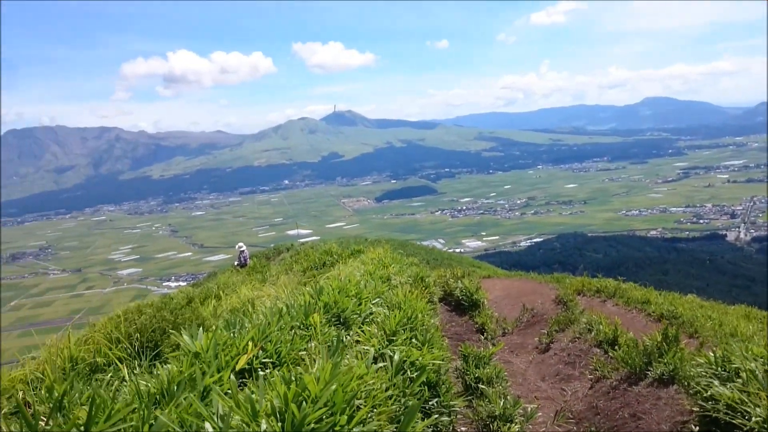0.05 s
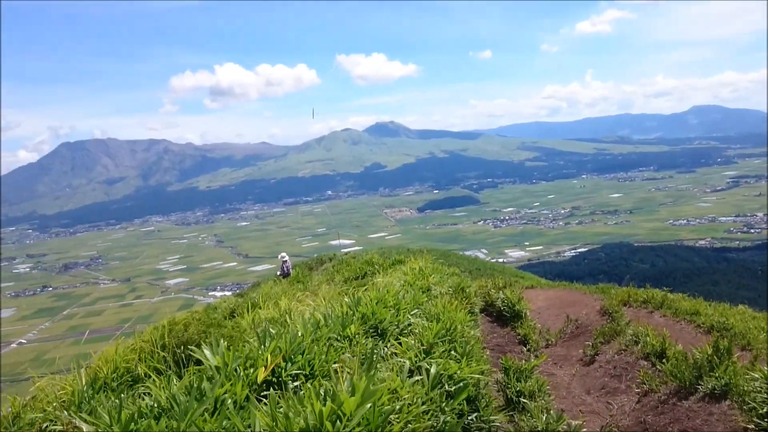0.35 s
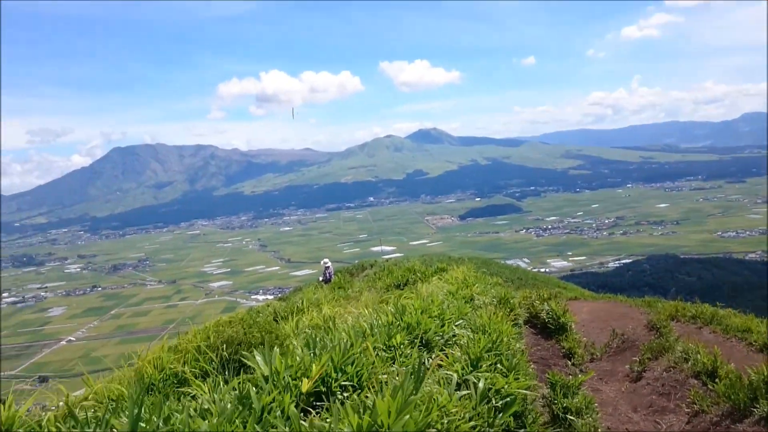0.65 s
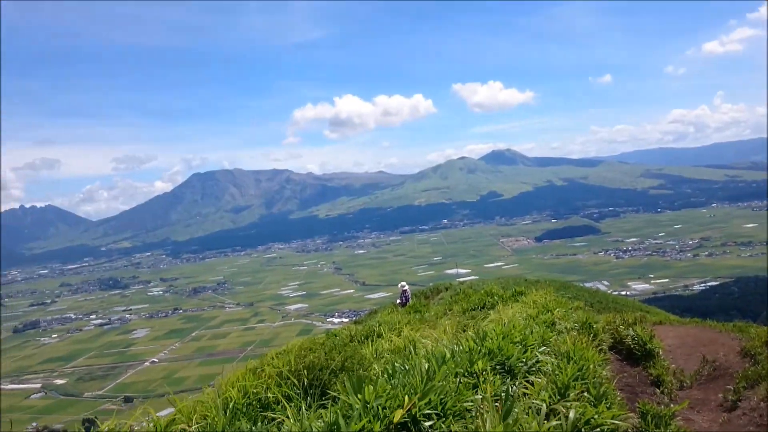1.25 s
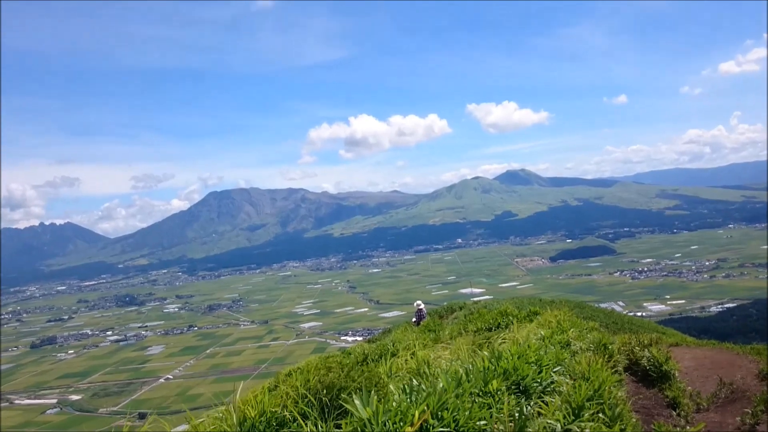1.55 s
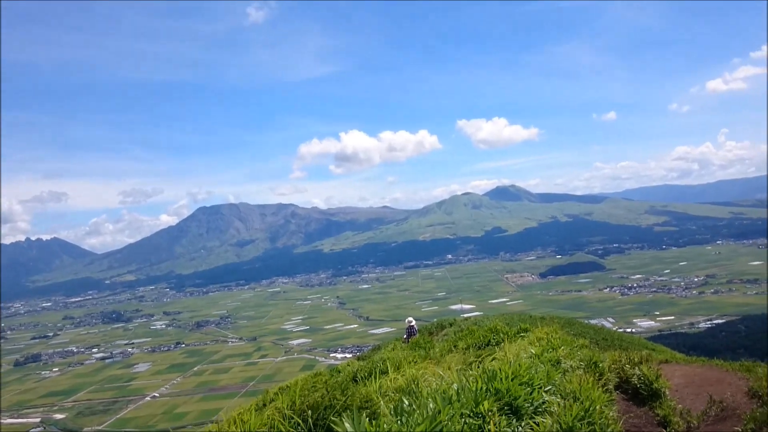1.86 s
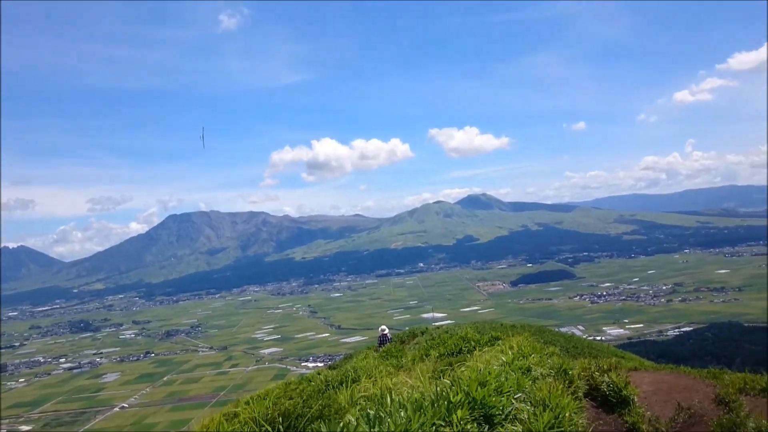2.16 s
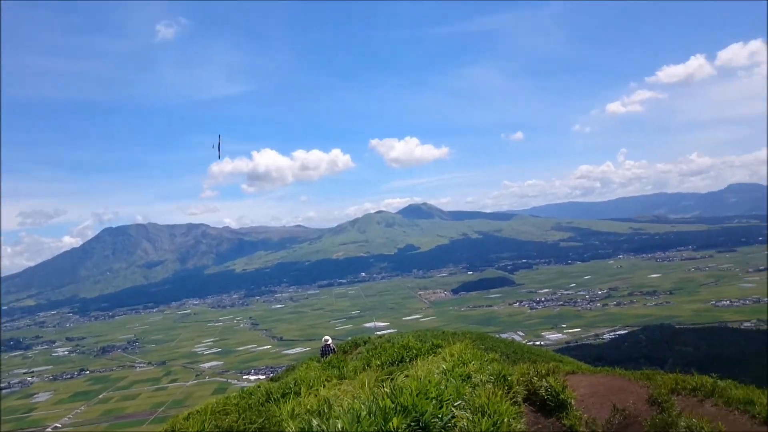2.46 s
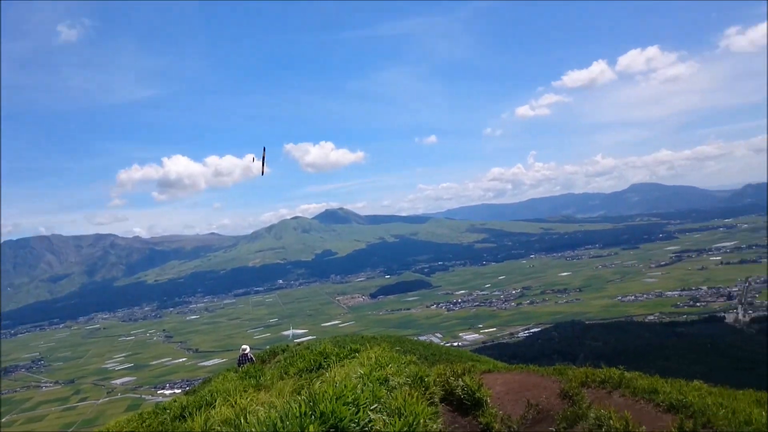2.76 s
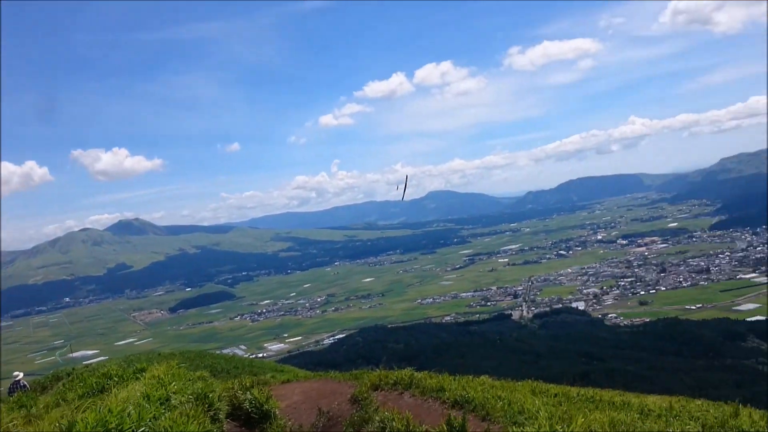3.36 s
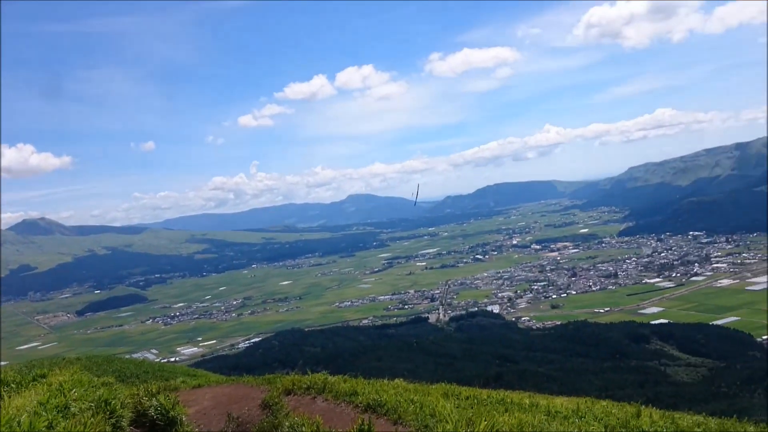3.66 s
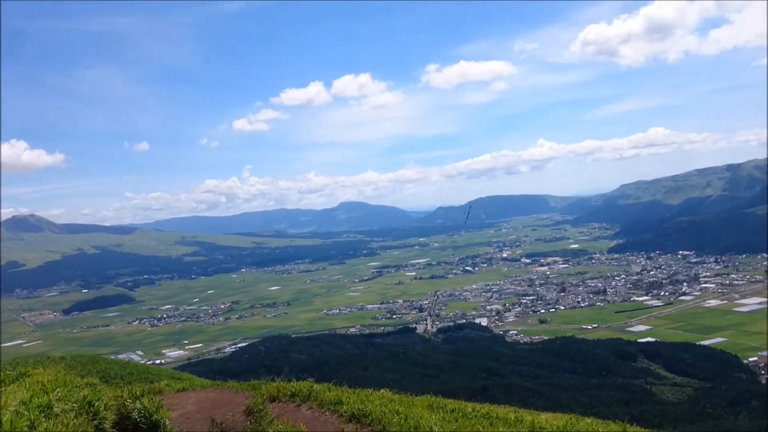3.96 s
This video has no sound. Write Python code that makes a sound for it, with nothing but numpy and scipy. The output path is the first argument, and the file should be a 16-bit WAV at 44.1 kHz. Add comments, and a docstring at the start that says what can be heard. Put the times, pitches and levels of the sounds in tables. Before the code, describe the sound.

A small model glider whistles faintly on the right, in thin, broken tones over rushing air. Wind buffets the microphone with rumbles and thumps until about 1.5 seconds, then drops, leaving the whistles clearer and slightly rising. After 2.2 seconds their pitch sags as the glider passes and gusts return; from 3 seconds they turn breathy. Hillside grass hisses softly throughout, swelling until about 2.5 seconds.

```python
"""Grassy hilltop, stereo microphone out in the wind, a model glider sweeping past on the right.
At first gusts buffet the two ports separately while air over the glider's edges and gaps starts thin,
broken whistles. The wind drops at about 1.5 s and the tones stand clear, rising together as the glider
gathers speed. After 2.2 s they sag as it passes and the gusts return; the last whistles are breathy.
Behind it all the hillside hisses, with swells in the nearby grass until about 2.5 s."""
import sys
import numpy as np
from scipy import signal
from scipy.fft import rfft, irfft
from scipy.io import wavfile

SR = 44100
rng = np.random.default_rng(int(sys.argv[2]) if len(sys.argv) > 2 else 0)


def put_to_file(sound):
    """Save the sound as 16-bit audio at rate SR, in the file named by the first command-line argument."""
    columns = np.atleast_2d(sound).T  # one column per channel
    safe = np.clip(columns, -1, 1)
    whole_steps = np.round(safe * 32767)
    wavfile.write(sys.argv[1], SR, whole_steps.astype(np.int16))


N = 176400


def whistles():
    """Edge tones on the glider catch and let go: fluttering lines in skirts of air noise, on one glide."""
    # pitch of all whistles, from airspeed and Doppler shift (time [s], pitch [ratio])
    pitch_glide = [(0, .998), (.42, 1.011), (1.07, 1.015), (1.14, 1.033), (1.27, 1.026), (1.42, 1.037),
                   (1.58, 1.038), (1.72, 1.061), (1.82, 1.049), (1.95, 1.066), (2.15, 1.073), (2.3, 1.05),
                   (2.6, 1.03), (2.73, 1.003), (2.87, .987), (3.1, .985)]
    # (start [s], end [s], pitch before the glide [Hz], skirt width [Hz], level [dB],
    #  attack [s], release [s])
    edge_tones = [(0, 0.306, 2374, 23, -42, 0.078, 0.14), (0.272, 0.377, 2370, 20, -35, 0.087, .03),
                  (0.382, .5, 2379, 20, -38, 0.028, 0.076), (-.1, .53, 2494, 74, -48.5, .05, .08),
                  (0.607, 0.814, 2379, 14, -39, 0.083, 0.019), (0.863, 1.89, 2085, 41, -44.5, 0.024, 0.035),
                  (1.433, 1.484, 2090, 12, -38.5, 0.03, 0.03), (0.957, 1.69, 2384, 15, -42, 0.077, 0.051),
                  (1.581, 1.91, 2372, 37, -32.5, 0.12, 0.13), (.6, 1.056, 2830, 22, -53, 0.3, 0.034),
                  (0.996, 1.078, 2910, 20, -42, 0.025, 0.048), (1.545, 1.89, 2856, 31, -46, 0.077, 0.029),
                  (1.754, 2.505, 2563, 49, -35.5, 0.56, 0.27), (2.127, 2.714, 1785, 52, -34.5, 0.6, 0.041),
                  (2.705, 2.767, 1783, 15, -26.5, 0.024, .027), (2.764, 3.017, 1797, 35, -33, .014, 0.14),
                  (2.454, 3.0, 2146, 45, -42.5, 0.15, 0.11), (2.59, 2.852, 3554, 55, -43.5, .15, 0.11),
                  (2.594, 2.97, 2610, 54, -42, 0.27, .05), (3.205, 3.42, 2906, 120, -52, 0.036, 0.15),
                  (3.495, 3.7, 2496, 280, -40.5, 0.059, .086), (3.708, 3.96, 2410, 140, -44.5, .042, 0.046)]
    waver, flutter_db, left_db = 0.0017, 0.3, -18
    glide = curve(pitch_glide) * (1 + waver * wander(25.7))
    out = 0
    for start, end, hz, width_hz, db, attack, release in edge_tones:
        white = rng.standard_normal(N) + 1j * rng.standard_normal(N)
        skirt = lowpass(lowpass(white, width_hz / 2, order=1), width_hz * 3)
        purity = 3.5 * np.exp(-(width_hz / 45) ** 2)  # the wider the skirt, the breathier the tone
        amplitude = (purity + skirt / skirt.std()) / np.hypot(purity, 1)
        phase = 2 * np.pi * np.cumsum(hz * glide) / SR
        tone = np.sqrt(2) * np.real(amplitude * np.exp(1j * phase))
        out = out + undb(db) * envelope(start, end, attack, release) * tone
    return out * undb(-flutter_db * wander(57)) * undb([[left_db], [0]])


def wing_rush():
    """Air rushing over the wings: broad, flickering noise under the whistles, off to the right."""
    # strength of the rush (time [s], level [dB])
    rush_level = [(0, -38), (.55, -40.5), (.8, -39.5), (1.2, -41.5), (1.55, -39), (1.75, -35.5),
                  (1.92, -43), (2.3, -41.5), (2.75, -41), (3.1, -45.5), (3.3, -46), (4, -48)]
    # its spectrum (frequency [Hz], relative level [dB])
    rush_colour = [(300, -30), (1100, -13.5), (1600, -8), (2300, 1), (2800, 1.5), (3200, -4), (3800, -4.5),
                   (4600, -15.5), (7000, -24), (16000, -30)]
    flicker_db, left_db = 1.3, -18
    rush = noise(rush_colour) * undb(curve(rush_level) + flicker_db * wander(71))
    return rush * undb([[left_db], [0]])


def wind():
    """Turbulence right on each port: a fluttering rumble whose upper part comes in quick eddies."""
    # gust strength (time [s], left relative level [dB], right relative level [dB])
    gusts = [(0.0, -17.5, -47), (0.04, -12.5, -34), (0.1, -19.5, -29), (0.24, -16.5, -30.5),
             (0.29, -9.5, -27.5), (0.35, -25.5, -24), (0.41, -10.5, -27), (0.45, -17.5, -16.5),
             (0.51, -8, -15), (0.62, -18, -19.5), (0.69, -17.5, -18.5), (0.82, -9.5, -13.5),
             (0.87, -22, -21), (0.98, -10, -17.5), (1.08, -10, -14), (1.17, -17.5, -16),
             (1.25, -7.5, -19.5), (1.33, -14, -16), (1.4, -17.5, -26.5), (1.47, -30, -26),
             (1.7, -35, -43.5), (1.83, -37, -31.5), (1.94, -41.5, -48), (2.0, -27.5, -45),
             (2.16, -19.5, -22.5), (2.31, -16.5, -29), (2.42, -28, -25.5), (2.58, -16, -30),
             (2.64, -21.5, -39), (2.8, -33, -27), (2.89, -19.5, -18), (2.97, -29, -26.5), (3.02, -10, -17),
             (3.12, -9, -17.5), (3.19, -16.5, -22), (3.36, -23, -21), (3.47, -21.5, -16.5),
             (3.76, -28, -19.5), (3.95, -13, -15), (4.0, -19, -16)]
    # rumble spectrum (frequency [Hz], left relative level [dB], right relative level [dB])
    rumble_colour = [(20, -16, -42), (35.3, -25, -38), (47.2, -15.5, -4.5), (63.6, 5, -1.5),
                     (97.7, -3.5, -3.5), (135.2, -7.5, -3), (261, -17, -12.5), (456, -31.5, -24),
                     (774, -43.5, -38.5), (1300, -57.5, -60.5), (3000, -77, -74)]
    gain_db, flutter_db, eddy_db, split_hz = -2, 2, 4.5, 218
    reference_db, brightening = -15, 0.78  # stronger gusts lift the upper rumble more
    out = []
    for rumble, gust_db in zip(noise(rumble_colour), (curve(gusts), curve(gusts, column=2))):
        low = lowpass(lowpass(rumble, split_hz)[::-1], split_hz)[::-1]  # both ways: no phase shift
        force = undb(gust_db + flutter_db * wander(41))
        eddies = undb(eddy_db * wander(79)) * (force / undb(reference_db)) ** brightening
        out.append(force * (low + eddies * (rumble - low)))
    return undb(gain_db) * np.array(out)


def buffets():
    """Vortices break on a port: a pressure swing with a ragged tail; small ones slap, large ones puff."""
    # (time [s], level [dB], left minus right [dB], pitch [Hz])
    vortices = [(.035, -25, 20, 352), (.286, -19, 8, 296), (0.401, -12.5, 25, 303), (0.501, -2, 20, 456),
                (.544, -7.5, 21, 323), (0.579, -17, 24, 332), (0.823, -8.5, -27, 370),
                (.835, -12.5, -25, 460), (.973, -25, 2, 373), (1.059, -16.5, 12, 485),
                (1.089, -13.5, 17, 355), (1.264, -9.5, 18, 275), (1.321, -11.5, -22, 380),
                (1.408, -15.5, 29, 338), (1.69, -22, 24, 115), (1.886, -26, 20, 130),
                (2.308, -20.5, 9, 305), (2.579, -22.5, 12, 117), (3.012, -17, 2, 317),
                (3.063, -12.5, 32, 332), (3.1, -16, 16, 410), (3.272, -24, 22, 375),
                (3.661, -18.5, -32, 384), (3.727, -11, -24, 206)]
    # spectrum of the ragged part (frequency [Hz], relative level [dB])
    ragged_colour = [(30, -8), (90, -1.5), (300, 4), (500, -2), (900, -10.5), (1400, -26), (2500, -49),
                     (5000, -82)]
    width_cycles, decay_cycles, ragged_hz = 0.56, 2.26, 640
    t = np.arange(N) / SR
    swings = raggedness = 0
    for (at, db, pan_db, hz), start_phase in zip(vortices, rng.random(len(vortices))):
        cycles = np.clip((t - at) * hz, -10, 20)
        gain = undb(db) * pan(pan_db)[:, None]
        pulse = np.exp(-(cycles / width_cycles) ** 2)
        tail = np.where(cycles < 0, pulse, np.exp(-cycles / decay_cycles))
        raggedness = raggedness + gain * tail * (hz / ragged_hz) ** 2  # higher ones are more ragged
        swings = swings + gain * pulse * np.cos(2 * np.pi * (cycles + start_phase))
    return swings + raggedness * noise(ragged_colour)


def port_overload(pressure):
    """The hardest buffets flatten against the limit of the microphone ports, which also dull them."""
    limit = 0.85
    flattened = pressure / (1 + (pressure / limit) ** 6) ** (1 / 6)
    return lowpass(flattened, hz=1700, order=4)


def grass():
    """Gusts comb the nearby grass in bright swells, over a slowly easing hiss from the hillside."""
    # strength of the swells (time [s], level [dB])
    swell_level = [(.4, -59), (.62, -48), (.71, -42), (.87, -40.5), (.94, -47), (1.01, -41.5), (1.3, -62.5),
                   (1.55, -42.5), (1.76, -40), (1.84, -41), (1.92, -60), (2.23, -55), (2.295, -42),
                   (2.38, -46.5), (2.44, -41.5), (2.56, -62)]
    # swell spectrum (frequency [Hz], left relative level [dB], right relative level [dB])
    swell_colour = [(400, -9, -57), (1580, -5, 9), (2310, -6, 11.5), (4010, -3, 12), (4400, -3.5, 0),
                    (6100, 1.5, -6), (6850, 6, 3), (9300, 4, 2), (11050, -9, -5), (13000, -12, -1.5),
                    (16000, -25, -4)]
    # hillside spectrum, peaking near 2.5 kHz where the right port rings
    # (frequency [Hz], left relative level [dB], right relative level [dB])
    hiss_colour = [(200, -20, 11), (1000, -2.5, -1), (2440, -5, 8.5), (4200, -10, 3), (4600, -6.5, -4.5),
                   (5980, 0.5, -4), (6500, 3.5, 3.5), (9070, 1.5, -11), (10740, -13.5, -8),
                   (13100, -16, -6.5), (16000, -17, -32)]
    flicker_db, midway_hiss_db, fade_db_per_s = 1.2, -50.5, 0.5
    flicker = undb(flicker_db * np.array([wander(48), wander(48)]))
    swells = noise(swell_colour) * undb(curve(swell_level)) * flicker
    hiss_db = midway_hiss_db - fade_db_per_s * (np.arange(N) - N / 2) / SR
    return swells + noise(hiss_colour) * undb(hiss_db)


def tick():
    """One faint, dry tick close to the microphone: a burst of bright noise that dies at once."""
    # (time [s], level [dB])
    onsets = [(.208, -39.5)]
    # its spectrum (frequency [Hz], relative level [dB])
    tick_colour = [(5000, -16), (7500, 2), (12000, -7), (16000, -12)]
    decay_s = 0.0046
    t = np.arange(N) / SR
    burst = sum(undb(db) * (t >= at) * np.exp(-np.abs(t - at) / decay_s) for at, db in onsets)
    return noise(tick_colour) * burst


def undb(db):
    """Decibels to amplitude."""
    return 10 ** (np.asarray(db) / 20)


def curve(rows, column=1):
    """One column of a table, joined by straight lines in time."""
    rows = np.array(rows)
    return np.interp(np.arange(N) / SR, rows[:, 0], rows[:, column])


def wander(rate_hz):
    """Smooth random motion with a spread of 1, mostly slower than rate_hz."""
    f = np.arange(N // 2 + 1) * SR / N
    x = irfft(rfft(rng.standard_normal(N)) * np.exp(-2 * (f / rate_hz) ** 2), N)
    return (x - x.mean()) / x.std()


def noise(colour):
    """Unrelated left and right noise of rms 1; the colour has one level column for both or one each."""
    rows, f = np.array(colour), np.arange(N // 2 + 1) * SR / N
    gain = undb([np.interp(np.log(f + 1), np.log(rows[:, 0]), rows[:, k]) for k in (1, -1)])
    x = irfft(rfft(rng.standard_normal((2, N))) * gain, N)
    return x / x.std()


def lowpass(x, hz, order=2):
    """Roll off the treble above hz."""
    return signal.sosfilt(signal.butter(order, hz, "low", fs=SR, output="sos"), x)


def envelope(start, end, attack, release):
    """Straight rise and fall, capped at 1."""
    t = np.arange(N) / SR
    return np.clip(np.minimum((t - start) / attack, (end - t) / release), 0, 1)


def pan(pan_db):
    """Left and right gains of constant total power."""
    gains = undb(np.array([pan_db, -pan_db]) / 2)
    return gains / np.sqrt(np.mean(gains ** 2, axis=0))


def scene():
    """The hilltop from the microphone: glider, wind on the ports, grass and a tick."""
    return whistles() + wing_rush() + port_overload(wind() + buffets()) + grass() + tick()


def record(dry):
    """The recorder cuts the top treble steeply."""
    top_hz = 15750
    return signal.sosfilt(signal.ellip(10, .2, 80, top_hz, fs=SR, output="sos"), dry)


dry = scene()
out = record(dry)
put_to_file(out)
```